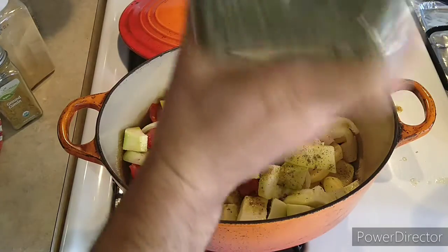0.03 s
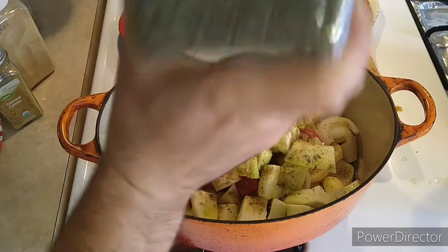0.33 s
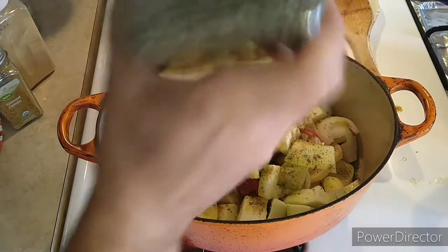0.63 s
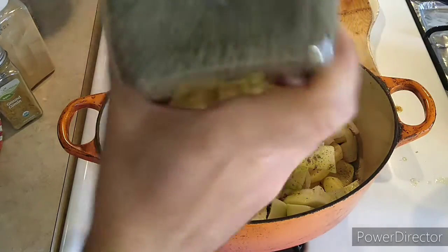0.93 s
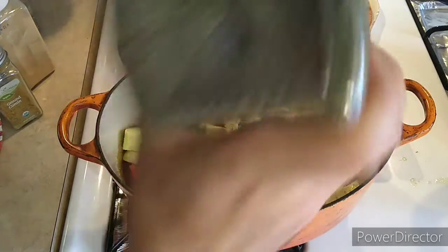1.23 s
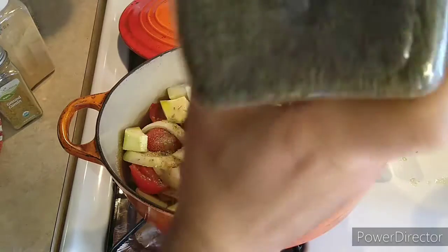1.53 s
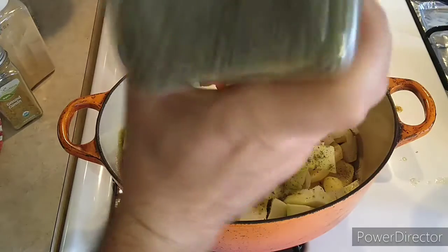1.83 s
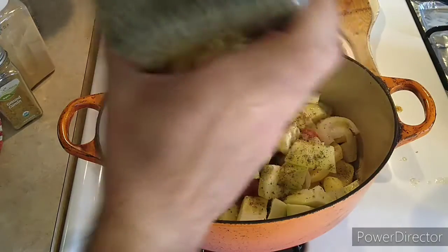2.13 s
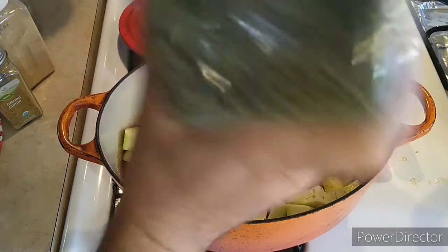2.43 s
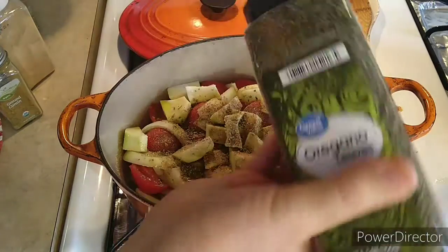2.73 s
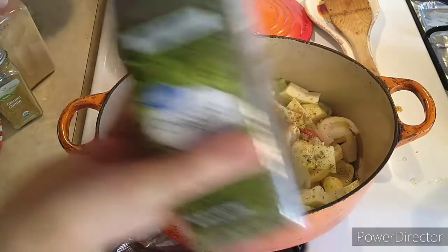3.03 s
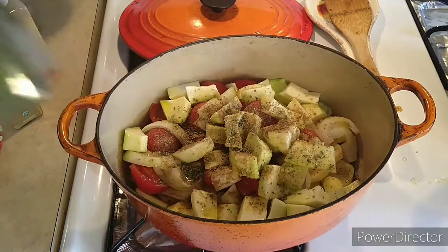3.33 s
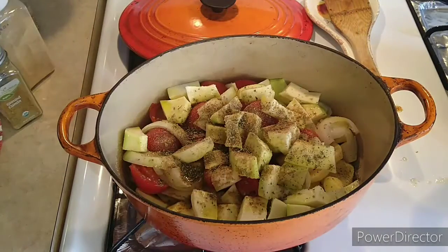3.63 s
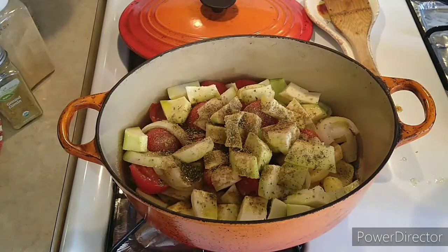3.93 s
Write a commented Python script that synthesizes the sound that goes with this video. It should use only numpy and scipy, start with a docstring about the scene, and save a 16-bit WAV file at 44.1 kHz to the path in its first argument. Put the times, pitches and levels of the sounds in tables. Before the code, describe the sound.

Dried herbs rattle in a plastic jar shaken quickly, then it is set down softly.

```python
"""Herb jar shaken over a pot

Dried flakes in a plastic jar, six shakes a second: they hit the lid with a hiss and a hollow
chuff, fly back against the base and slide along the wall. They settle as the hand turns the
jar upright. It is set down with a few taps, over a faint whirr and a low kitchen hum."""
import sys
import numpy as np
from scipy import signal
from scipy.fft import rfft, irfft
from scipy.io import wavfile
from scipy.ndimage import uniform_filter1d

SR = 44100
rng = np.random.default_rng(int(sys.argv[2]) if len(sys.argv) > 2 else 0)


def output_pcm(signal):
    """Save a mono or channel-first signal as 16-bit PCM at the path in sys.argv[1].

    Samples are clipped to [-1, 1] before scaling.
    """
    pcm = np.clip(np.atleast_2d(signal).T, -1, 1) * 32767
    wavfile.write(sys.argv[1], SR, np.round(pcm).astype(np.int16))


N = 176400
T = np.arange(N) / SR

# flakes landing on the lid, on the base, settling: t/s, level/dB, spread/s
LID_HITS = [(.006, -34.5, 0.0095), (.166, -33, 0.0072), (0.336, -36, 0.0076), (.506, -34.5, 0.0057),
            (0.674, -33.5, 0.0052), (0.847, -32.5, 0.0055), (1.018, -32, 0.0055), (1.186, -32, 0.0068),
            (1.357, -33.5, 0.0082), (1.529, -31, 0.0044), (1.701, -33.5, .0066), (1.859, -32.5, 0.0046),
            (2.026, -33.5, 0.0052), (2.203, -35.5, 0.0067), (2.363, -34.5, 0.0071)]
BASE_HITS = [(.063, -34, 0.0058), (.23, -36, 0.0078), (.399, -36, 0.0065), (0.567, -37, 0.0092),
             (0.739, -35, .0069), (.914, -36.5, 0.0078), (1.083, -36.5, 0.0082), (1.25, -35.5, 0.0076),
             (1.423, -34.5, 0.006), (1.598, -34.5, 0.0067), (1.756, -36, 0.0079), (1.918, -35.5, 0.0066),
             (2.086, -36.5, 0.0055), (2.259, -40, .0087), (2.43, -37.5, 0.01)]
SETTLING = [(2.327, -43, 0.00075), (2.565, -45.5, 0.0076), (2.596, -55.5, 0.016), (2.663, -50.5, 0.0082),
            (2.705, -53, 0.016), (3.627, -61, 0.0088), (3.899, -62, 0.023)]
# clumps thudding on the plastic: t/s, level/dB, f/Hz, spread/s
CHUFFS = [(.01, -40, 575, 0.0058), (0.171, -34, 633.3, 0.0027), (0.336, -38.5, 593.4, 0.0045),
          (.345, -41.5, 604, 0.0015), (0.507, -36.5, 496, 0.0023), (0.597, -43.5, 950, 0.003),
          (0.678, -42, 650, 0.0019), (0.849, -41, 611, 0.0046), (1.019, -35.5, 570, 0.0022),
          (1.189, -41, 670, 0.0047), (1.356, -42, 628.5, 0.0025), (1.435, -48.5, 623, .006),
          (1.53, -38.5, 648, 0.005), (1.702, -42.5, 608, 0.0041), (1.859, -35.5, 586, 0.0039),
          (2.028, -42, 657, 0.0034), (2.208, -36.5, 615.6, 0.0016), (2.355, -43.5, 646, 0.0031),
          (2.369, -45.5, 639.5, 0.0021), (2.557, -56, 618, 0.0026)]
# jar meeting the counter: t/s, knock level/dB, click level/dB
TAPS = [(3.5388, -47, -66), (3.5969, -58, -54), (3.6132, -73, -46.5)]
# envelopes of flakes in flight and of the low drone: t/s, level/dB
TRICKLE_LEVEL = [(0, -57.5), (1.3, -57.5), (2.1, -59.5), (2.48, -64), (2.54, -60), (2.6, -59), (2.72, -89),
                 (2.8, -78)]
DRONE_LEVEL = [(0, -64.5), (.52, -60), (.61, -47.5), (.67, -67), (.75, -53), (.81, -62), (.9, -50),
               (1.02, -58.5), (1.17, -46.5), (1.52, -50.5), (1.67, -61), (1.76, -53), (1.85, -78.5),
               (2.08, -57), (2.15, -59.5), (2.32, -58), (2.4, -64), (2.8, -70)]
# grip squeak, sinking whirr: t/s, f/Hz, level/dB
SQUEAK_GLIDE = [(2.86, 2120, -91), (2.99, 1990, -72), (3.06, 1980, -94)]
WHIRR_GLIDE = [(3.38, 970, -87), (3.46, 943, -74), (3.6, 820, -71), (3.68, 775, -68), (3.82, 735, -76),
               (3.92, 727, -92)]
# source spectra: f/Hz, relative level/dB
LID_EQ = [(100, -9), (280, -6.5), (480, 4), (950, 4), (1400, 0), (2150, -7), (2900, 4.5), (5500, 0),
          (7500, -2.5), (10000, 0.5), (13100, 6), (14000, 1), (15500, 1.5)]
THUD_EQ = [(150, -20.5), (420, -6.5), (950, 3), (1400, -5), (5000, -30)]
BASE_EQ = [(100, -62), (350, -7), (600, 0), (1200, -2.5), (2150, -2), (3000, 2), (5500, -1), (7500, -3),
           (10000, 0), (13100, 4.5), (14000, -1), (15500, -6)]
SLIDE_EQ = [(100, 2), (180, -4.5), (300, -7.5), (480, -6), (690, 7.5), (800, 1), (950, 4), (1350, -1.5),
            (1750, -10), (2200, -11), (5000, -17)]
STEM_EQ = [(200, -31.5), (700, -2.5), (1200, 0), (2100, -6.5), (3200, 0), (5500, -5.5), (8000, -6.5),
           (12500, -5), (15500, -3.5)]
LOOSE_EQ = [(100, -5), (350, -11), (620, 5), (1200, -2), (2150, -3), (3300, 2.5), (5500, 3), (7500, -3),
            (10000, 0.5), (13300, 8.5), (15500, -5.5)]
KNOCK_EQ = [(80, -16), (350, -5), (2000, 2.5), (2500, -2), (5600, -4), (7500, -11.5), (15000, -27)]
CLICK_EQ = [(1000, -2), (5000, 0), (7500, -3), (11500, 3.5), (16000, -9)]
RUB_EQ = [(300, -10), (1250, 3), (6000, -7), (15000, -40)]
AIR_EQ = [(12, -35), (22, -7.5), (45, 0), (70, -2.5), (100, -9), (160, -17.5), (215, -16.5), (300, -22.5),
          (450, -23), (740, -24), (950, -27), (2100, -34), (2600, -32.5), (4500, -31.5), (7000, -37),
          (16000, -42.5)]
# plastic wall resonances: f/Hz, added gain
WALL_MODES = [(940, 0.11), (1750, 0.98), (2800, 0.31), (3940, 0.22), (5530, 0.34), (6680, 0.78)]
# ring of the knocked jar: f/Hz, level/dB re knock, t60/s
JAR_MODES = [(538, -3, 0.057), (770, -4.5, 0.053), (1160, -4, .05), (1270, -4, .08), (1950, -12, .06)]
# appliance hum lines: f/Hz, level/dB
HUM_LINES = [(120, -69), (240, -69.5), (360, -78.5), (480, -78), (720, -79.5)]
# room decay: f/Hz, t60/s
ROOM_T60 = [(200, 0.51), (1000, 0.32), (4000, 0.3), (14000, 0.17)]
# left-right likeness: f/Hz, coherence 0-1
COHERENCE = [(100, 1), (600, 0.79), (1200, 0.44), (2500, 0.12), (5000, 0)]

LEFT_LEAD_S, HISS_PAN_DB = 0.000091, 0.33
FLAKES_PER_S = 40000


def flake_hiss(hits, eq, late_db, late_lag_s, late_spread_s):
    """The mass of flakes lands on one end of the jar, stragglers behind it."""
    power = np.zeros(N)
    for t_s, db, spread_s in hits:
        stragglers = amp(late_db) ** 2 * bell(t_s + late_lag_s, late_spread_s)
        power += amp(db) ** 2 * (landing(t_s, spread_s) + stragglers)
    grains = impacts(power, FLAKES_PER_S, scatter_db=3)
    return stereo(colour(grains, eq), HISS_PAN_DB, LEFT_LEAD_S)


def landing(t_s, spread_s, steepness=3.16):
    """Power of one landing: steep front, softer back."""
    u = (T - t_s) / spread_s
    front = np.minimum(abs(u) / 1.05, 9) ** steepness
    return np.exp(-.5 * np.where(u < 0, front, u ** 2))


def impacts(power, peak_per_s, scatter_db=0):
    """Tiny impacts of random size, more and harder as the power rises."""
    chance = np.clip(peak_per_s / SR * (power / power.max()) ** .3, 1e-6, 1)
    size = unit(amp(scatter_db * np.minimum(rng.exponential(1, N), 5)))
    struck = rng.random(N) < chance
    return struck * size * np.sqrt(power / chance) * rng.standard_normal((2, N))


def lid_chuff(waver=.1, thud_db=-9.5, pan_db=1.5):
    """Each clump drums the jar's hollow resonance for a few cycles, over a broad thud."""
    tone, total_power = np.zeros((2, N))
    clock_s = np.cumsum(1 + waver * wander(samples=100)) / SR
    for t_s, db, hz, spread_s in CHUFFS:
        power = amp(db) ** 2 * bell(t_s, spread_s)
        tone += np.sqrt(2 * power) * np.sin(2 * np.pi * (hz * clock_s + rng.random()))
        total_power += power
    thud = stereo(colour(impacts(total_power, FLAKES_PER_S), THUD_EQ), pan_db, LEFT_LEAD_S)
    delayed = np.interp(T - LEFT_LEAD_S, T, tone)
    return amp(thud_db) * thud + np.array([tone * amp(pan_db), delayed * amp(-pan_db)])


def wall_slide(gain_db=-9, lag_s=0.016, spread_s=0.01):
    """After falling back, the flakes patter along the wall."""
    power = sum(amp(db + gain_db) ** 2 * bell(t_s + lag_s, spread_s) for t_s, db, _ in BASE_HITS)
    patter = impacts(power, peak_per_s=6000, scatter_db=1.5)
    return stereo(colour(patter, SLIDE_EQ), pan_db=-0.9, lead_s=LEFT_LEAD_S)


def stems(gain_db=-10):
    """Coarse bits of stem tick in every landing."""
    power = sum(amp(db) ** 2 * bell(t_s + spread_s / 2, 2.51 * spread_s)
                for t_s, db, spread_s in LID_HITS + BASE_HITS)
    ticks = impacts(power, peak_per_s=2600, scatter_db=2.5)
    return amp(gain_db) * stereo(colour(ticks, STEM_EQ), HISS_PAN_DB, LEFT_LEAD_S)


def loose_flakes():
    """Strays tick between strokes and slide down as the jar tilts."""
    trickle = envelope(TRICKLE_LEVEL) ** 2
    settling = sum(amp(db) ** 2 * bell(t_s, spread_s) for t_s, db, spread_s in SETTLING)
    return stereo(colour(impacts(trickle + settling, peak_per_s=15000), LOOSE_EQ))


def wall_ring(x, width_hz=32):
    """The thin plastic adds short rings to the rattle."""
    return x + sum(gain * signal.lfilter(*signal.iirpeak(hz, hz / width_hz, SR), x)
                   for hz, gain in WALL_MODES)


def flicker(x, depth_db=2):
    """The colour flickers in random patches, about 26 ms by 700 Hz."""
    frames = dict(nperseg=256, noverlap=192)
    spectra = signal.stft(x, **frames)[2]
    patches = rng.standard_normal(spectra[0].T.shape)
    patches = uniform_filter1d(patches, size=18, axis=0)  # time
    patches = uniform_filter1d(patches, size=4, axis=1)  # frequency
    gain = unit(amp(depth_db * unit(patches).T))
    return signal.istft(spectra * gain, **frames)[1][:, :N]


def set_down(snap_db=9.5, snap_s=0.00031, knock_decay_s=0.005, click_decay_s=0.0036, room_db=-3.5):
    """A dull knock on the counter, then sharper clicks as the jar rocks flat."""
    knocks, clicks, ring = np.zeros((3, 2, N))
    for t_s, knock_db, click_db in TAPS:
        age_s = np.maximum(T - t_s, 0)
        noise = rng.choice([-1, 1], (2, N)) * (T >= t_s)
        snap = amp(snap_db) * np.exp(-age_s / snap_s)  # first contact
        knocks += amp(knock_db) * noise * (snap + np.exp(-age_s / knock_decay_s))
        clicks += amp(click_db) * noise * (snap + np.exp(-age_s / click_decay_s))
        for hz, db, t60_s in JAR_MODES:
            fall_db = 60 * np.minimum(age_s / t60_s, 3)
            ring += amp(knock_db + db - fall_db) * np.sin(2 * np.pi * hz * age_s)
    taps = stereo(colour(knocks, KNOCK_EQ) + colour(clicks, CLICK_EQ), pan_db=2.0) + ring
    return taps + amp(room_db) * room(taps)


def grip(rub_db=-69.5):
    """Skin rubs and faintly squeaks on the turning jar."""
    friction = rng.standard_normal((2, N)) * np.sqrt(bell(t_s=2.91, spread_s=0.1))
    rub = amp(rub_db) * stereo(colour(friction, RUB_EQ))
    return rub + noise_glide(SQUEAK_GLIDE, width_hz=150)


def whirr():
    """A faint whirr sinks in pitch around the set-down."""
    return noise_glide(WHIRR_GLIDE, width_hz=28)


def room(x, density=.1, predelay_s=.004):
    """Sparse reflections, each band dying at its own rate."""
    n = SR // 2
    echoes = rng.standard_normal((2, n)) * (rng.random((2, n)) < density) * (T[:n] > predelay_s)
    hz, t_s, spectra = signal.stft(echoes, SR, nperseg=256)
    decay = amp(-60 * t_s / at_hz(ROOM_T60, hz)[:, None])
    tail = signal.istft(spectra * decay, SR, nperseg=256)[1]
    return stereo(signal.fftconvolve(x, tail / np.linalg.norm(tail[0]), axes=1)[:, :N])


def kitchen(air_db=-58, drone_hz=68.8, wander_hz=0.93):
    """Room rumble and air, appliance hum, a wavering low drone."""
    air = amp(air_db) * stereo(colour(rng.standard_normal((2, N)), AIR_EQ, size=16384))
    hum = sum(amp(db) * np.sqrt(2) * np.sin(2 * np.pi * (hz * T + rng.random()))
              for hz, db in HUM_LINES)
    pitch_hz = drone_hz + wander_hz * wander(samples=3000)
    drone = np.sqrt(2) * np.sin(2 * np.pi * np.cumsum(pitch_hz) / SR)
    return air + hum + drone * envelope(DRONE_LEVEL)


def amp(db):
    """dB to gain."""
    return 10 ** (np.asarray(db) / 20)


def unit(x):
    """Scale to rms 1."""
    return x / np.sqrt(np.mean(x ** 2) + 1e-20)


def wander(samples):
    """Smoothed noise, rms 1."""
    return unit(uniform_filter1d(rng.standard_normal(N), size=samples))


def bell(t_s, spread_s):
    """Gaussian pulse, peak 1."""
    return np.exp(-.5 * ((T - t_s) / spread_s) ** 2)


def envelope(table):
    """Gain over time from a level table."""
    return amp(np.interp(T, *np.transpose(table)))


def at_hz(table, hz):
    """Table lookup on a log-frequency axis."""
    knots_hz, values = np.transpose(table)
    return np.interp(np.log(hz + 1), np.log(knots_hz + 1), values)


def colour(x, eq, size=4096):
    """Minimum-phase filter of energy 1."""
    log_gain = np.log(amp(at_hz(eq, abs(np.fft.fftfreq(size, 1 / SR)))))
    fir = np.fft.ifft(np.exp(np.conj(signal.hilbert(log_gain)))).real[:size // 2]
    return signal.oaconvolve(x, fir[None] / np.linalg.norm(fir), axes=1)[:, :N]


def noise_glide(glide, width_hz):
    """Narrow noise band following a pitch and level curve."""
    t_s, hz, db = np.transpose(glide)
    i, q = signal.lfilter(*signal.butter(2, width_hz / 2, fs=SR), rng.standard_normal((2, N)))
    phase = 2 * np.pi * np.cumsum(np.interp(T, t_s, hz)) / SR
    gain = amp(np.interp(T, t_s, db, left=-np.inf, right=-np.inf))
    return unit(i * np.cos(phase) + q * np.sin(phase)) * gain


def stereo(x, pan_db=0, lead_s=0):
    """Channels alike in the bass, unrelated in the treble; left ahead by lead_s."""
    hz = np.fft.rfftfreq(N, 1 / SR)
    left, other = rfft(x)
    coherence = np.clip(at_hz(COHERENCE, hz), 0, 1)
    right = coherence * left + np.sqrt(1 - coherence ** 2) * other
    right *= np.exp(-2j * np.pi * hz * lead_s)
    return irfft(np.array([left * amp(pan_db), right * amp(-pan_db)]), N)


def scene():
    """The jar close by, in a small kitchen."""
    lid = flake_hiss(LID_HITS, LID_EQ, late_db=-5, late_lag_s=0.012, late_spread_s=0.011)
    base = flake_hiss(BASE_HITS, BASE_EQ, late_db=-6.5, late_lag_s=0.025, late_spread_s=0.0037)
    rattle = flicker(wall_ring(lid + base + wall_slide() + stems() + loose_flakes()))
    chuff = lid_chuff()
    reverb = room(amp(-10.5) * rattle + amp(-18) * chuff)
    return rattle + chuff + reverb + grip() + set_down() + whirr() + kitchen()


def record(dry):
    """Low-pass at 15.7 kHz."""
    lowpass = signal.firwin(401, 15700, window=("kaiser", 8), fs=SR)
    return signal.oaconvolve(dry, lowpass[None], "same")


dry = scene()
out = record(dry)
output_pcm(out)
```